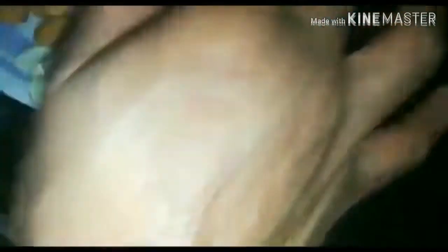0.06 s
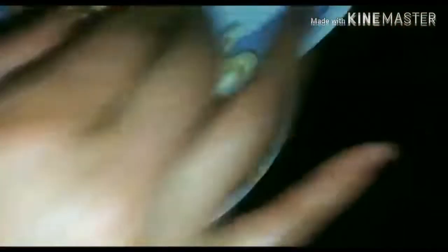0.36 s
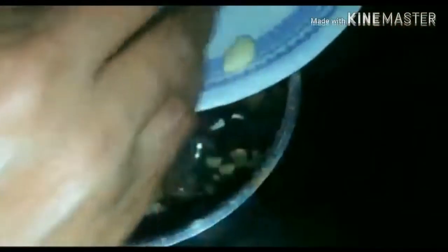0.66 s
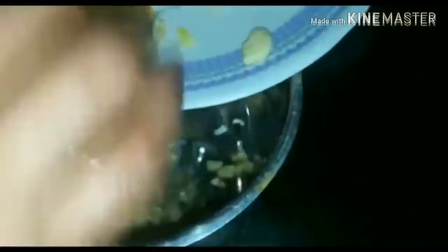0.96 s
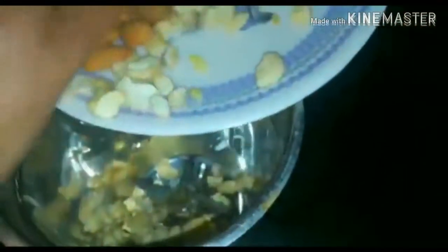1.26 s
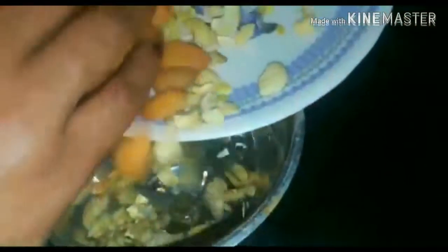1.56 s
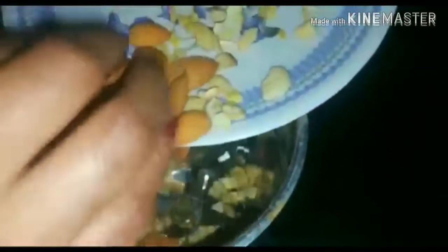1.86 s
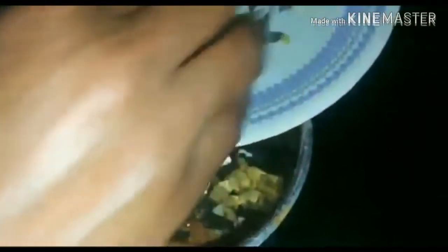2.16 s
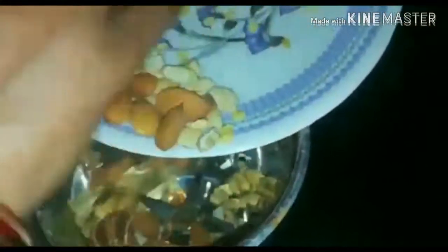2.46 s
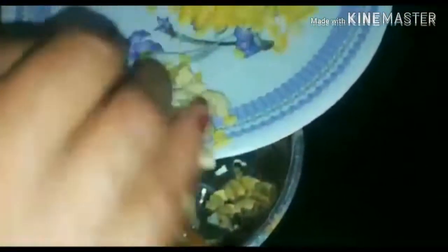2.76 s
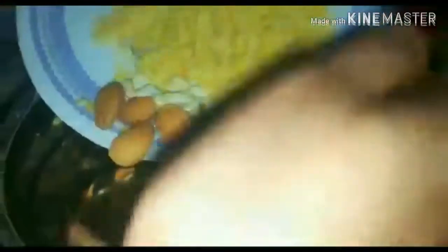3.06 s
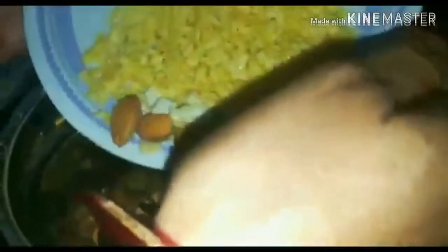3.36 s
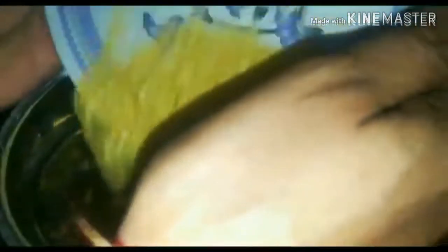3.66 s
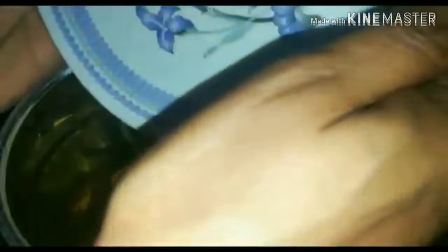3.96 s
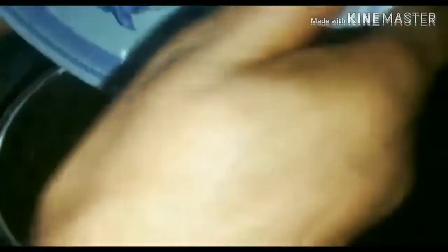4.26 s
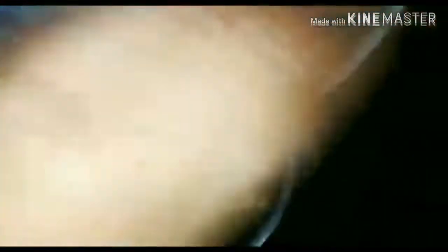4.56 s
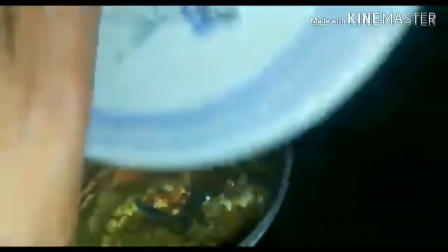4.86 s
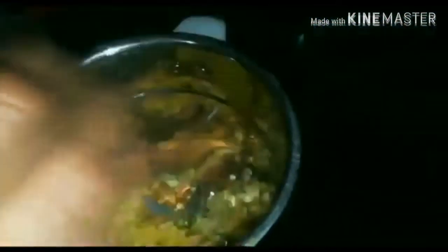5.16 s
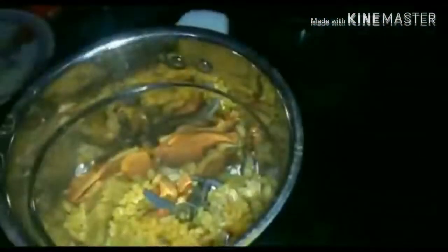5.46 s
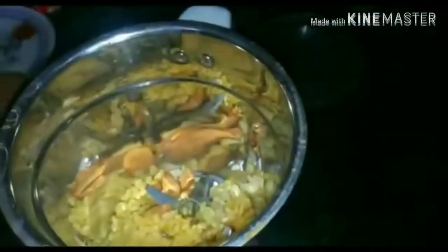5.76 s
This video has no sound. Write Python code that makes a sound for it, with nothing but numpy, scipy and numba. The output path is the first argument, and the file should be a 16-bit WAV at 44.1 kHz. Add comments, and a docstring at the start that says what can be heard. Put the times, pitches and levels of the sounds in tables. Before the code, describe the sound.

In a small kitchen, a plate knocks against a steel jar and nuts tumble in, singly and in clusters, with hard clacks and a thin metallic ring. Fingers rub crumbs across the plate between the drops. Then a quick rush of lentils patters onto the steel, and lighter taps and wiping finish it. Everything is very near the microphone, leaning right, with slight distortion on the peaks.

```python
"""A small kitchen, a phone very close: its right microphone faces the jar and overloads.
Fingers sweep nuts off a ceramic plate into a steel jar in several handfuls; the wall clacks and rings,
the air inside plops, the rim sings. Salted lentils follow in one hissing pour of tiny impacts.
Then the plate is tapped, wiped clean and put aside."""
import sys
import numpy as np
from scipy import signal
from scipy.fft import rfft, irfft, next_fast_len
from scipy.io import wavfile
from scipy.ndimage import uniform_filter1d, minimum_filter1d
from numba import njit

SR = 44100
rng = np.random.default_rng(int(sys.argv[2]) if len(sys.argv) > 2 else 0)


def wrap_up_sound(samples):
    """Save the sound to the file named by the first command line argument, as 16-bit audio."""
    columns = np.atleast_2d(samples).T
    # keep every value between -1 and 1, then stretch to whole-number steps
    tamed = np.clip(columns, -1, 1)
    steps = np.round(tamed * 32767).astype(np.int16)
    wavfile.write(sys.argv[1], SR, steps)


N = 260566
TIME_S, HIT_TIME_S = np.arange(N) / SR, np.arange(SR // 3) / SR
POUR_FULL_S, HEAP_DELAY_S = 3.656, 0.066


def amp(db):
    """Decibels to gain."""
    return 10 ** (np.asarray(db) / 20)

def unit(x):
    """Scale to rms 1."""
    return x / np.sqrt(np.mean(x ** 2) + 1e-20)

def along(points, hz):
    """Interpolate (freq_hz, value) points on a log axis."""
    freqs, values = np.transpose(points)
    return np.interp(np.log(hz + 1), np.log(freqs + 1), values)

def filtered(x, response):
    """Apply a frequency response."""
    size = next_fast_len(N + 8192)
    return irfft(rfft(x, size) * response(np.fft.rfftfreq(size, 1 / SR)), size)[..., :N]

def band(x, colour, lo_hz=1, hi_hz=SR, order=12):
    """Colour x between two steep edges; rms 1."""
    def response(hz):
        return amp(along(colour, hz)) / (1 + (lo_hz / (hz + 1)) ** order) / (1 + (hz / hi_hz) ** order)
    return unit(filtered(x, response))

def noise(shared):
    """Stereo white noise with a shared fraction of power."""
    return np.sqrt(shared) * rng.standard_normal(N) + np.sqrt(1 - shared) * rng.standard_normal((2, N))

def grains(rate_per_s):
    """Tiny random impacts, sized differently at each microphone."""
    return unit((rng.random(N) < rate_per_s / SR) * noise(0.32))

def add(track, start_s, sound):
    """Mix a sound in at start_s."""
    start = round(start_s * SR)
    part = sound[..., :N - start]
    track[..., start:start + part.shape[-1]] += part

def decay(t60_s, attack_s):
    """Envelope of one blow."""
    return amp(-60 * HIT_TIME_S / t60_s) * (1 - np.exp(-HIT_TIME_S / attack_s))

def snap(t60_s, attack_s, snap_db=-6.5, snap_t60_s=0.04):
    """Envelope of a hard contact: brief snap over a longer decay."""
    return 0.8 * decay(t60_s, attack_s) + amp(snap_db) * decay(snap_t60_s, attack_s)

def blow(texture, envelope, ripple_db=5, spacing_hz=170):
    """Dense, short-lived modes; each contact point favours different ones."""
    size = len(envelope)
    start = rng.integers(N - size)
    spectrum = rfft(texture[:, start:start + size])
    hz = np.fft.rfftfreq(size, 1 / SR)
    favour = np.interp(hz / spacing_hz, np.arange(len(hz)), rng.uniform(-2.03, 1, len(hz)))
    return unit(irfft(spectrum * amp(ripple_db * favour), size)) * envelope


def stroke(start_s, length_s, attack_s=0.034, sag_db_per_s=7, release_db_per_s=332.5):
    """Stroke gain: fingers press, ease off, lift."""
    age_s = np.maximum(TIME_S - start_s, 0)
    drop_db = sag_db_per_s * age_s + release_db_per_s * np.maximum(age_s - length_s, 0)
    return np.minimum(age_s / attack_s, 1) * amp(-drop_db)

# Crumb, salt and skin spectra: freq_hz, gain_db
CRUMB_COLOUR = [(1200, -31), (1800, -5.5), (2500, 4), (3800, 4.5), (6600, 4.5), (10000, -4), (15500, -15)]
SALT_COLOUR = [(4000, -10.5), (9000, 0.5), (15500, -10.5)]
SKIN_COLOUR = [(40, -23), (70, -1.5), (110, 6.5), (240, -9.5), (470, -7), (650, -19.5), (950, -5.5),
               (2500, -4), (3500, -35)]
# Finger strokes on the plate: start_s, length_s, crumbs_db, skin_db
STROKES = [(0, 0.35, -34, -43.5), (.5, 0.24, -35.5, -43.5), (0.823, 0.17, -21.5, -41.5),
           (1.136, 0.31, -37.5, -54), (1.592, 0.6, -40, -58), (2.368, 0.72, -38.5, -67),
           (3.12, 0.15, -57, -78), (3.284, 0.78, -45.5, -71), (4.0, 0.031, -56, -72),
           (4.125, .15, -45, -63), (4.475, 0.047, -56, -58), (4.6, 0.23, -48.5, -86),
           (5.631, .1, -33.5, -49), (5.809, 0.048, -41, -68)]

def wiping(salt_db=-6, catch_db=-8):
    """Crumbs scrape and catch on the glaze, skin rubs; salt crackles from the pour's peak on."""
    crumb_gain, skin_gain = sum(amp([[crumbs_db], [skin_db]]) * stroke(start_s, length_s)
                                for start_s, length_s, crumbs_db, skin_db in STROKES)
    salt = amp(salt_db) * (TIME_S > POUR_FULL_S) * band(grains(700), SALT_COLOUR, lo_hz=3000)
    impulses = grains(rate_per_s=60)
    click = blow(noise(0.4), decay(0.02, 0.00034))
    catches = signal.fftconvolve(impulses, click, axes=1)[:, :N]
    scrape = band(grains(5200), CRUMB_COLOUR) + amp(catch_db) * band(catches, CRUMB_COLOUR)
    return crumb_gain * (scrape + salt) + skin_gain * band(noise(0.91), SKIN_COLOUR)


# Hand bumps: start_s, level_db, pitch_hz
BUMPS = [(.001, -21.5, 296), (0.014, -20, 350), (3.968, -41, 175), (4.107, -42.5, 169), (4.45, -40, 155),
         (4.671, -36, 119)]

def hand_bumps(gain_db=3, t60_s=0.039):
    """The hand bumps jar and table: one low damped mode each."""
    out = np.zeros(N)
    for start_s, level_db, pitch_hz in BUMPS:
        tone = np.sin(2 * np.pi * pitch_hz * HIT_TIME_S)
        add(out, start_s, amp(level_db + gain_db) * decay(t60_s, 0.0008) * tone)
    return out


# Plate on jar rim and table: start_s, clack_db, treble_re_clack_db
TAPS = [(.0024, -11.5, -12), (0.0254, -12, -34), (0.074, -18, -26), (1.075, -3.5, -9), (1.1372, -24.5, -22),
        (2.4035, -20, -17), (2.4421, -15, -23), (3.239, -29, -9.5), (3.2543, -26, -15.5),
        (3.2795, -28, -23.5), (3.9668, -21, -9.5), (4.1047, -27.5, -3), (4.2406, -22.5, -12),
        (4.4492, -19.5, -19.5), (4.5959, -25, -25.5), (5.6304, -17, 1.5), (5.687, -23, 2),
        (5.7076, -24.5, -5.5), (5.76, -17.5, -24.5), (5.821, -21.5, -19.5)]
# Crumbs flicked off the glaze: start_s, treble_db
CRUMB_TICKS = [(3.4973, -25), (3.5418, -31.5), (3.669, -15), (3.697, -13.5), (3.996, -35.5), (4.1154, -34),
               (4.2148, -24), (4.333, -37), (4.4365, -29.5), (4.47, -31.5), (4.6993, -31.5),
               (4.7349, -17.5), (4.746, -18.5), (4.8405, -22.5), (4.8645, -28), (4.8733, -24),
               (4.8975, -24), (5.3607, -40)]
# Plate spectrum: freq_hz, gain_db
PLATE_COLOUR = [(300, -7), (600, -19), (1000, -7.5), (2200, -5.5), (3200, 10.5), (4200, 1), (6000, 0),
                (9500, 0.5), (15500, -14.5)]
# Held plate's modes: pitch_hz, level_db, t60_s
PLATE_MODES = [(990, -7, .045), (1360, -5, .05), (1810, -3, .05), (2850, -3, .04), (3090, -2, .035),
               (3590, -2, .05)]

def plate_taps(t60_s=0.1, clack_gain_db=-6, treble_gain_db=3, knock_gain_db=-2, modes_gain_db=-12):
    """The held plate rings briefly: hollow knocks and dry ticks, treble dying first."""
    knock = band(noise(0.76), PLATE_COLOUR, 420, 1400)
    clack = band(noise(0.15), PLATE_COLOUR, 1800, 7500)
    treble = band(noise(0.083), PLATE_COLOUR, 4100)
    clack_envelope = snap(t60_s, 0.0004, snap_db=-3.5, snap_t60_s=0.022)
    heavy = [(start_s, db, db + treble_re_db, db - 18) for start_s, db, treble_re_db in TAPS]
    light = [(start_s, db - 8.5, db, db - 85) for start_s, db in CRUMB_TICKS]
    out = np.zeros((2, N))
    for start_s, clack_db, treble_db, knock_db in heavy + light:
        tap = amp(clack_db + clack_gain_db) * blow(clack, clack_envelope)
        tap += amp(treble_db + treble_gain_db) * blow(treble, decay(0.46 * t60_s, 0.0015))
        tap += amp(knock_db + knock_gain_db) * blow(knock, decay(0.74 * t60_s, 0.0013))
        for pitch_hz, level_db, mode_t60_s in PLATE_MODES:
            # heavy contacts reach the low modes
            force_db = np.interp(pitch_hz, [1000, 2800], [knock_db + 16, clack_db])
            gripped_hz = pitch_hz * rng.normal(1, 0.04)  # the grip keeps changing
            gain = amp(force_db + level_db + modes_gain_db + rng.normal(0, 2))
            tap += gain * decay(mode_t60_s, 0.00087) * np.sin(2 * np.pi * gripped_hz * HIT_TIME_S)
        add(out, start_s, tap)
    return out


# Soft landings: start_s, upper_mode_db, lower_mode_db
LANDINGS = [(.027, -23, -32.5), (0.179, -50, -37), (.478, -46.5, -30), (0.522, -31.5, -37),
            (0.582, -35.5, -43.5), (0.723, -32, -45), (0.824, -23.5, -32), (1.018, -33.5, -32.5),
            (2.44, -62, -36.5), (2.48, -38, -41.5), (3.239, -52, -36.5), (3.607, -40, -38.5),
            (3.655, -47, -39)]
# Air in the jar: pitch_hz, t60_s
AIR_MODES = [(950, .09), (505, .075)]

def air_plops(gain_db=4):
    """Soft landings excite two hollow air modes in the jar."""
    out = np.zeros(N)
    for start_s, *levels_db in LANDINGS:
        for level_db, (pitch_hz, t60_s) in zip(levels_db, AIR_MODES):
            tone = np.sin(2 * np.pi * pitch_hz * rng.normal(1, 0.042) * HIT_TIME_S)
            add(out, start_s, amp(level_db + gain_db) * decay(t60_s, 0.0012) * tone)
    return out


# Fingernail flicks: start_s, level_db, pitch_hz
NAILS = [(0.3794, -22, 5480), (0.603, -12, 6200), (0.6523, -7, 5370), (0.681, -24, 5900),
         (0.7798, -14.5, 5300)]

def nail_ticks(width=0.22, gain_db=2, t60_s=0.022):
    """A nail snaps off the glaze: one broad, bright, brief resonance."""
    out = np.zeros((2, N))
    for start_s, level_db, hz in NAILS:
        peak = [(hz / 4, -26), (hz * (1 - width), -13), (hz, 0), (hz * (1 + width), -13), (3 * hz, -20)]
        texture = band(noise(0.28), peak, lo_hz=1600)
        add(out, start_s, amp(level_db + gain_db) * blow(texture, decay(t60_s, 0.0004)))
    return out


# Single nuts on steel: start_s, clack_db, treble_re_clack_db, knock_re_clack_db
NUTS = [(0.422, -17, -3.5, -15.5), (0.4408, -3, -24.5, -31), (0.5843, -26.5, 7, -23.5),
        (.605, -20, -2, -29.5), (.805, -15.5, 1.5, -11.5), (0.9558, -9, -5.5, -35),
        (1.0022, -13.5, -5, -24), (1.4675, -13.5, -0.5, -46.5), (1.5015, -14, -4, -44.5),
        (1.5803, -18, -2, -42), (1.5961, -8.5, -13, -29.5), (1.6255, -7.5, -8, -18), (1.712, -18, 6, -14.5),
        (1.736, -4.5, -14.5, -23.5), (1.8232, -5, -7, -24), (1.8727, -14.5, -4.5, -38.5),
        (1.8855, -7.5, -8.5, -26), (1.8999, -8.5, -0.5, -18), (1.9765, -7, -8.5, -48),
        (2.115, -6.5, -9.5, -27), (2.3207, -16.5, -11, -50), (2.359, -18.5, -3.5, -20),
        (2.4711, -10.5, -8.5, -28), (2.7527, -6, -12, -44), (2.7807, -12.5, -9, -41),
        (2.8133, -9.5, -9, -50), (3.5825, -17.5, -1.5, -32)]
# Handfuls: middle_s, length_s, clack_db, treble_re_clack_db, knock_re_clack_db, ring_re_clack_db
HANDFULS = [(0.482, 0.057, -9, -2, -12, 2.5), (0.879, .065, -4.5, -8.5, -20, 2),
            (1.769, .03, -1, -12, -19, 1), (2.827, .014, -8, -16, -26.5, 1)]

def nut_strikes(per_handful=5, edge_db=-4.5):
    """Nuts land singly or in clusters. Rows: start_s, clack_db, treble_db, knock_db, ring_db."""
    # a squarer hit (more knock) rings the wall more
    nuts = [(start_s, db, treble, knock, 8 + 0.21 * knock) for start_s, db, treble, knock in NUTS]
    for middle_s, length_s, db, *colour in HANDFULS:
        slots = np.arange(per_handful) + 0.5 + rng.uniform(-0.25, 0.25, per_handful)
        for place in 2 * slots / per_handful - 1:
            nuts.append((middle_s + place * length_s / 2, db + edge_db * place ** 2, *colour))
    return [(start_s, db, db + treble, db + knock, db + ring) for start_s, db, treble, knock, ring in nuts]

# Jar impact spectrum: freq_hz, gain_db
JAR_COLOUR = [(200, -22), (500, -22), (1400, -23.5), (1900, -8.5), (2400, 2), (3200, 2.5), (4500, 2.5),
              (6000, 0.5), (9000, -8), (15500, -20)]

def nut_clacks(strikes, clack_gain_db=-8, knock_gain_db=-5, bounce_db=-10):
    """Dull knock, clack of dense wall modes and bright crack; each nut then bounces twice."""
    knock = band(noise(0.24), JAR_COLOUR, 110, 1800)
    clack = band(noise(0.69), JAR_COLOUR, 1736, 4400)
    treble = band(noise(0.043), JAR_COLOUR, 3706)
    out = np.zeros((2, N))
    for start_s, clack_db, treble_db, knock_db, _ in strikes:
        strike = amp(clack_db + clack_gain_db) * blow(clack, snap(t60_s=0.089, attack_s=0.0024))
        strike += amp(treble_db) * blow(treble, snap(t60_s=0.093, attack_s=0.00048))
        thump = amp(knock_db + knock_gain_db) * blow(knock, decay(t60_s=0.1, attack_s=0.003))
        add(out, start_s, strike + thump)
        for bounce, wait_s in enumerate(np.cumsum(rng.uniform(0.0046, 0.02, size=2)), 1):
            add(out, start_s + wait_s, amp(bounce_db * np.sqrt(bounce)) * strike[::-1])  # channels swap
    return out


@njit
def resonate(drive, turn, loss):
    """One mode with time-varying loss per sample."""
    out, state = np.zeros(len(drive), np.complex128), 0j
    for n in range(len(drive)):
        state = state * turn * (1 - loss[n]) + drive[n]
        out[n] = state
    return out

# Steel wall modes: pitch_hz, level_db, base_t60_s
WALL_MODES = [(1109, -24, .4), (1793, -11, .25), (1857, -12.5, .65), (2078, -7, .45), (2164, -9, .25),
              (2419, -7, .88), (2482, -7.5, .6), (2664, -9, .25), (2771, 2.5, .25), (2873, -6, .35),
              (2942, -4, .2), (3105, -2, .16), (3203, -4, .14), (3289, -3, .2), (3354, -4, .17),
              (3712, -5, .26), (4040, -10, .2), (4213, -6, .6), (4377, -12, .7), (4920, -17, .3),
              (5190, -17, .25), (5889, -13, .2), (6640, -17, .3)]
# Hand on the jar: time_s, damping_factor
GRIP = [(0, 1.46), (1.4, 1.11), (1.75, 1.25), (2.5, 1.32), (2.8, 1.08), (3.2, 2.33)]

def steel_ring(strikes, scatter_db=4, lentil_db=-50):
    """Nuts kick the wall's modes at random strengths, lentils keep them humming, the hand damps them."""
    start_s, *_, ring_db = np.transpose(strikes)
    starts = (start_s * SR).astype(int)
    damping = np.interp(TIME_S, *np.transpose(GRIP))
    shape = (len(strikes), len(WALL_MODES))
    kicks = amp(ring_db[:, None] + rng.normal(0, scatter_db, shape)) * np.sign(rng.standard_normal(shape))
    hiss = band(rng.standard_normal(N), LENTIL_COLOUR, 2250, 7100)
    patter = amp(lentil_db) * flow(POUR_FULL_S + HEAP_DELAY_S) * hiss
    out = np.zeros(N)
    for (pitch_hz, level_db, base_t60_s), mode_kicks in zip(WALL_MODES, kicks.T):
        drive = amp(level_db) * (np.bincount(starts, mode_kicks, N) + patter)
        loss = damping * np.log(1000) / (base_t60_s * SR)
        out += resonate(drive, np.exp(2j * np.pi * pitch_hz / SR), loss).real
    # the ring carries no bass: only what lies above about 1.1 kHz is heard
    return signal.sosfilt(signal.butter(4, 1150, "high", fs=SR, output="sos"), out)

def stereo_ring(strikes, shared=0.33):
    """Both microphones hear the near wall; the left also hears the far side."""
    near, far = steel_ring(strikes), steel_ring(strikes)
    return np.array([np.sqrt(shared) * near + np.sqrt(1 - shared) * far, near])


# Nuts catching the rim: start_s, level_db
RIM_HITS = [(2.114, -16), (2.473, -23), (2.83, -32)]

def rim_note(pitch_hz=2587, t60_s=0.84):
    """The rim sings one note; each hit stops and restarts it."""
    out = np.zeros(N)
    for start_s, level_db in RIM_HITS:
        age_s = np.maximum(TIME_S - start_s, 0)
        note = amp(level_db - 60 * age_s / t60_s) * np.sin(2 * np.pi * pitch_hz * age_s)
        out = np.where(TIME_S > start_s, note, out)
    return out


def flow(full_s, hold_s=0.14, rise_db_per_s=123, fall_db_per_s=165.5):
    """Pour gain: swells until full_s, holds, dies as the plate empties."""
    early_s = np.maximum(full_s - TIME_S, 0)
    late_s = np.maximum(TIME_S - POUR_FULL_S - hold_s, 0)
    return amp(-rise_db_per_s * early_s - fall_db_per_s * late_s)

# Lentil impact spectrum: freq_hz, gain_db
LENTIL_COLOUR = [(900, -32), (1700, -24), (2050, -8), (2400, 1), (2900, -2), (3600, 0), (5000, -2),
                 (7000, 2), (10000, 0), (15500, -4)]

def lentils(patter_db=-24, fizz_db=-19):
    """Light grains patter on the steel, then fizz on the heap."""
    stream = grains(rate_per_s=13000)
    patter = amp(patter_db) * flow(POUR_FULL_S) * band(stream, LENTIL_COLOUR, 1696, 6800)
    fizz = amp(fizz_db) * flow(POUR_FULL_S + HEAP_DELAY_S) * band(stream, LENTIL_COLOUR, 6500)
    return patter + fizz


# Room decay: freq_hz, t60_s
ROOM_DECAY = [(150, 0.27), (1000, 0.77), (4000, 0.28), (9000, 0.33), (16000, 0.46)]

def kitchen(x, delay_s=0.006):
    """Tiled walls reverberate, each frequency at its own decay rate."""
    hz, t, spectra = signal.stft(rng.standard_normal((2, SR // 2)), SR, nperseg=256)
    fade = amp(-60 * t / along(ROOM_DECAY, hz)[:, None])
    _, tail = signal.istft(spectra * fade, SR, nperseg=256)
    tail = np.pad(tail / np.linalg.norm(tail[0]), ((0, 0), (round(delay_s * SR), 0)))
    return signal.fftconvolve(x, tail, axes=1)[:, :N]

# Microphone balance: freq_hz, left_minus_right_db
BALANCE = [(100, -1), (400, 0), (800, 11.5), (1300, 2), (2300, -9), (3200, -12), (4400, -4.5),
           (8000, -13.5), (15000, -4)]

def microphones(hz, left_lag_s=0.00059):
    """Stereo response: the right side faces the jar, so it hears earlier and brighter."""
    left = amp(along(BALANCE, hz))
    delay = np.exp(-2j * np.pi * hz * left_lag_s)
    return np.array([left * delay, np.ones_like(left)]) * 2 / (1 + left)

# Room noise spectrum: freq_hz, gain_db
ROOM_COLOUR = [(25, -5.5), (65, -10), (108, 1.5), (175, -8), (300, -14), (880, -21.5), (1500, -21.5),
               (4000, -24.5), (16000, -35)]

def scene(ring_db=-15, jar_room_db=-13, plate_room_db=-10, floor_db=-61):
    """Sources and reverb at the microphones, over faint room noise."""
    strikes = nut_strikes()
    jar = nut_clacks(strikes) + lentils()
    handling = plate_taps() + nail_ticks() + air_plops() + hand_bumps()
    reverb = kitchen(amp(jar_room_db) * jar + amp(plate_room_db) * handling)
    mix = jar + handling + amp(ring_db) * stereo_ring(strikes) + rim_note() + wiping() + reverb
    return filtered(mix, microphones) + amp(floor_db) * band(noise(0.8), ROOM_COLOUR)

def record(dry, ceiling=3.7, hold_s=0.0008, hardness=6, top_hz=15700):
    """Fast limiter, soft clip at full scale, low-pass."""
    size = round(hold_s * SR)
    needed_gain = np.minimum(1, ceiling / (np.abs(dry) + 1e-9))
    limited = dry * uniform_filter1d(minimum_filter1d(needed_gain, size), size)
    clipped = limited / (1 + np.abs(limited) ** hardness) ** (1 / hardness)
    return filtered(clipped, lambda hz: hz < top_hz)


dry = scene()
out = record(dry)
wrap_up_sound(out)
```